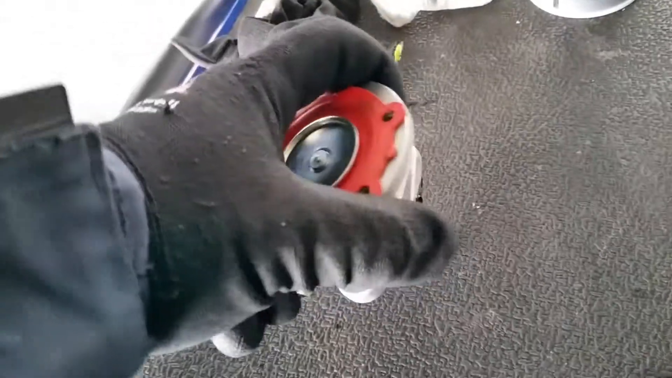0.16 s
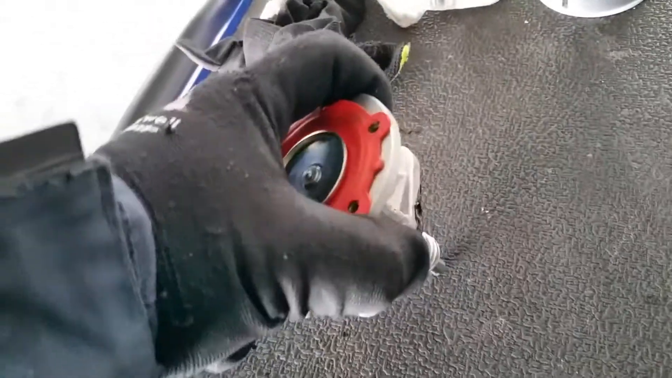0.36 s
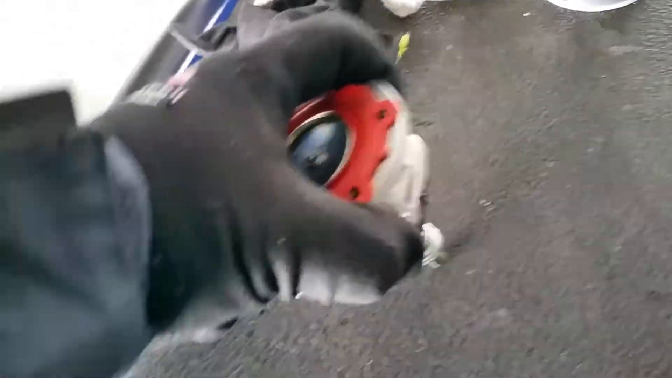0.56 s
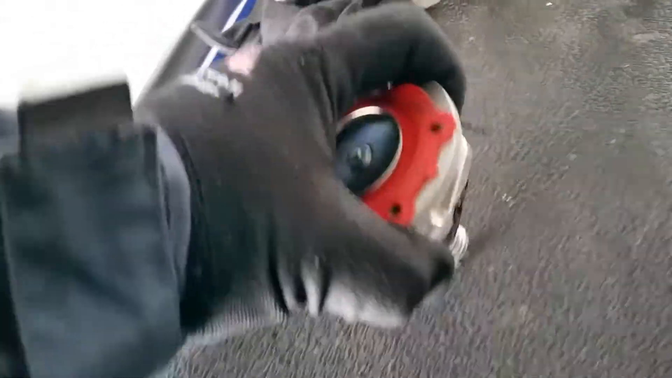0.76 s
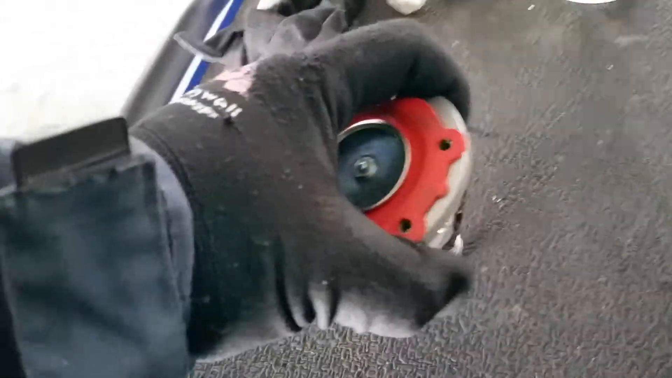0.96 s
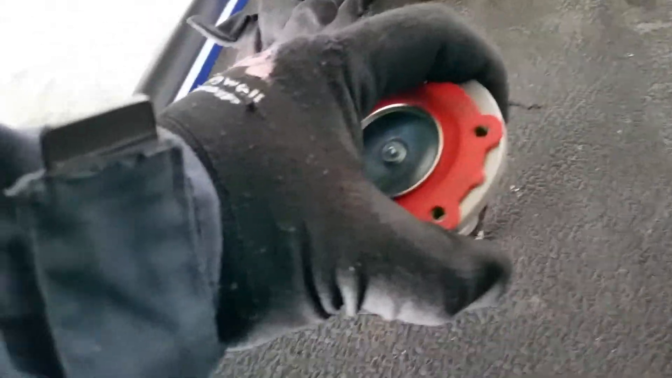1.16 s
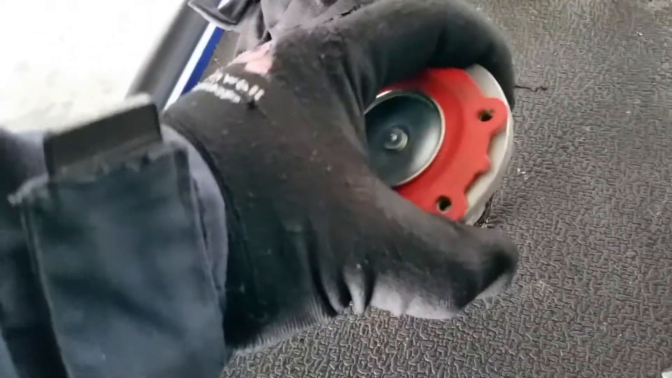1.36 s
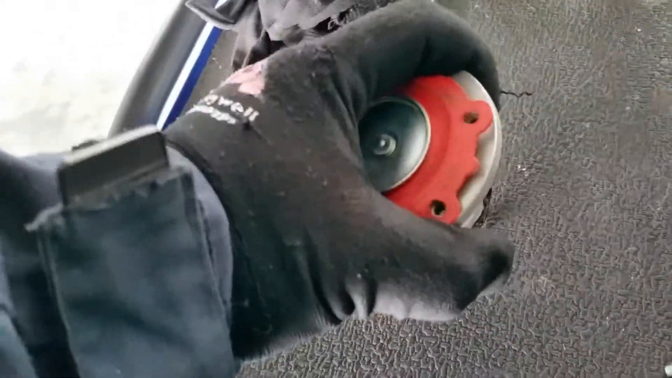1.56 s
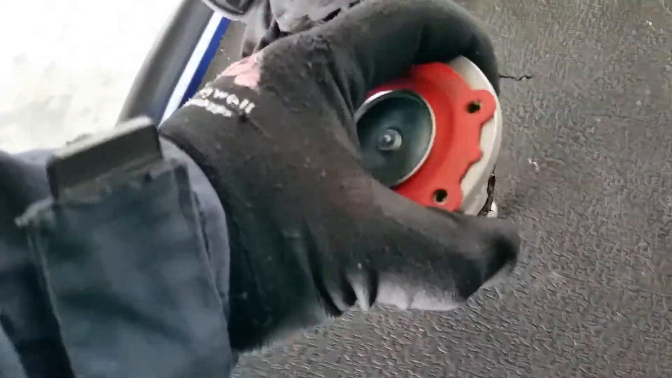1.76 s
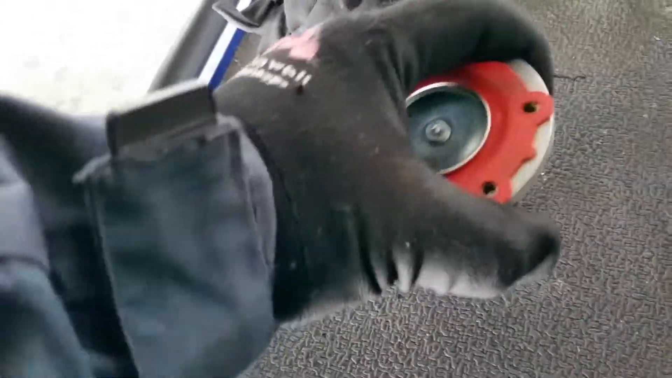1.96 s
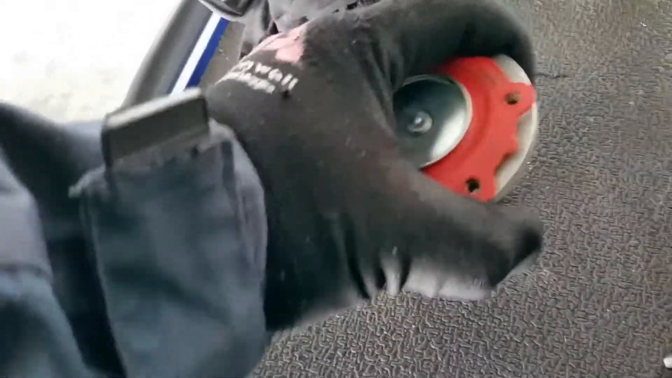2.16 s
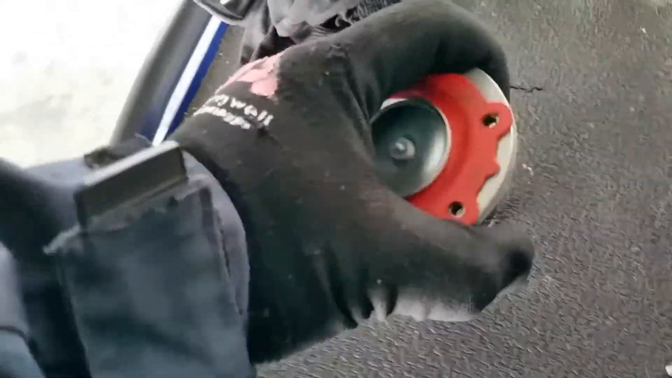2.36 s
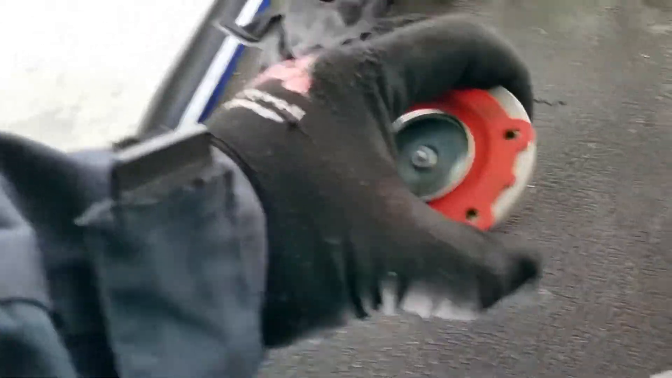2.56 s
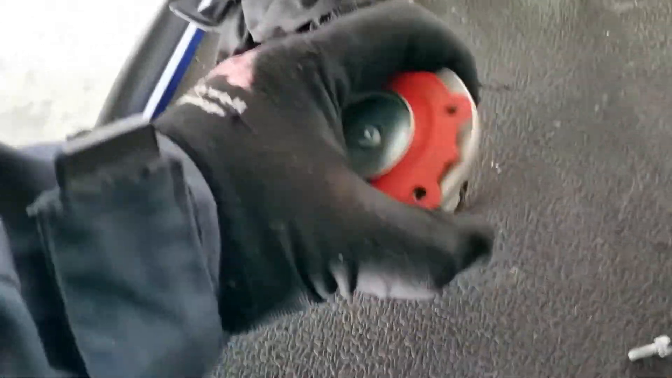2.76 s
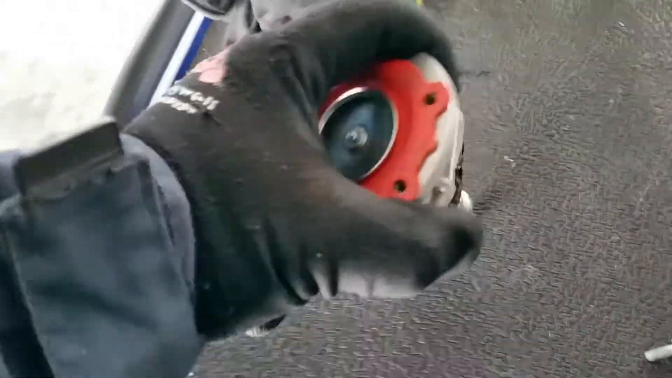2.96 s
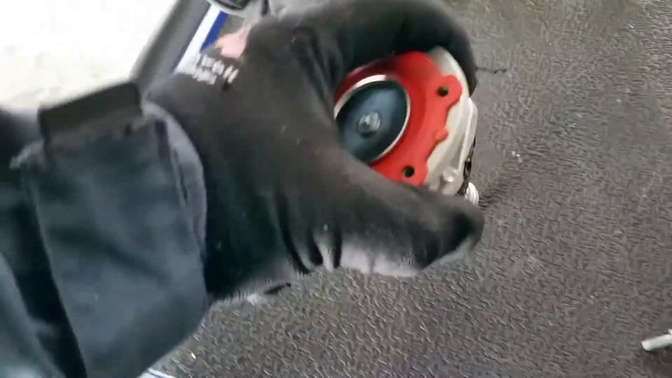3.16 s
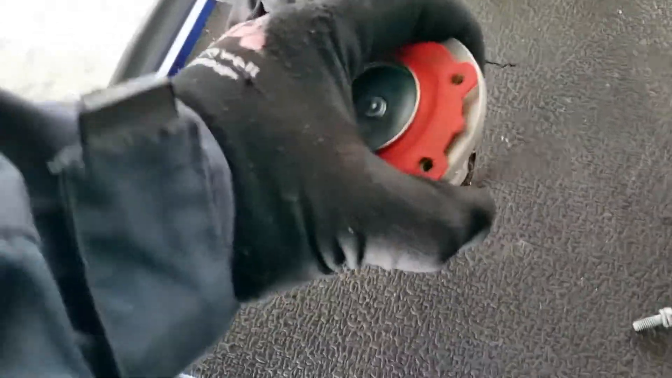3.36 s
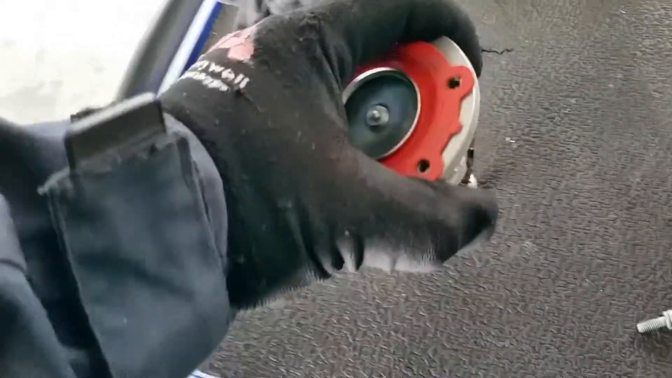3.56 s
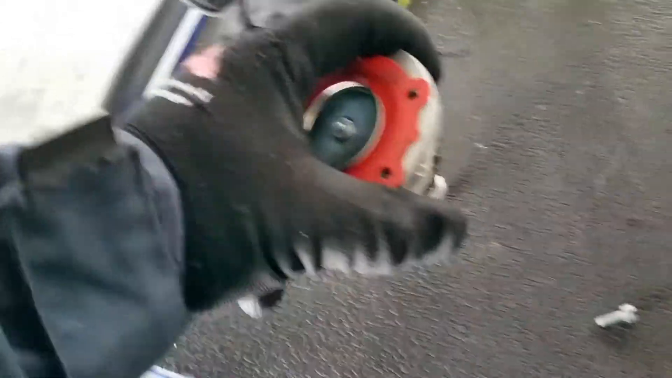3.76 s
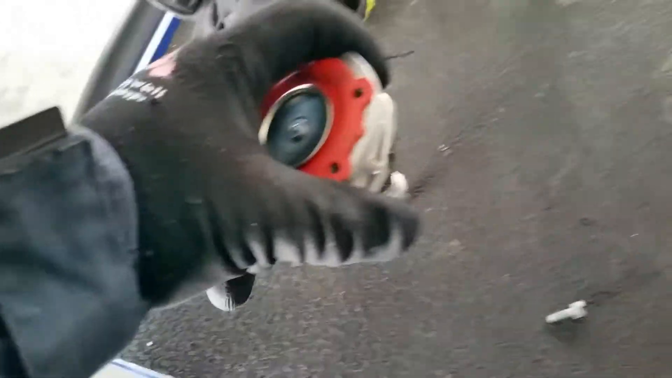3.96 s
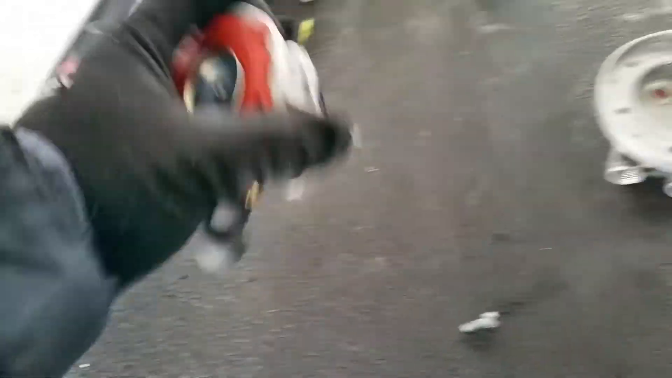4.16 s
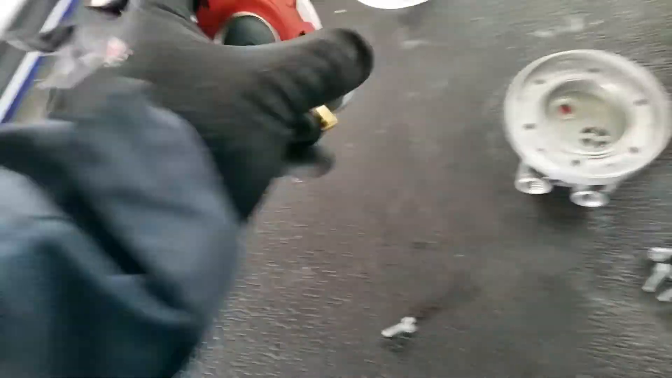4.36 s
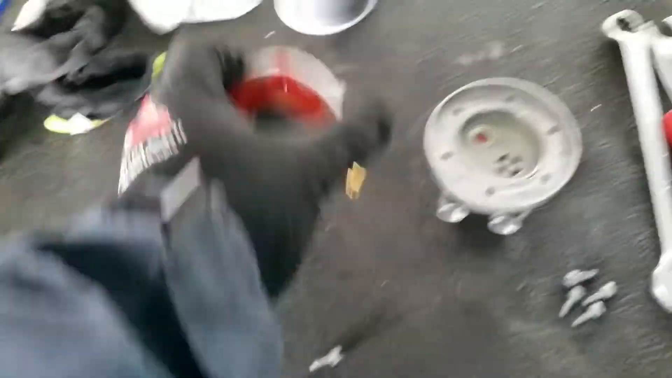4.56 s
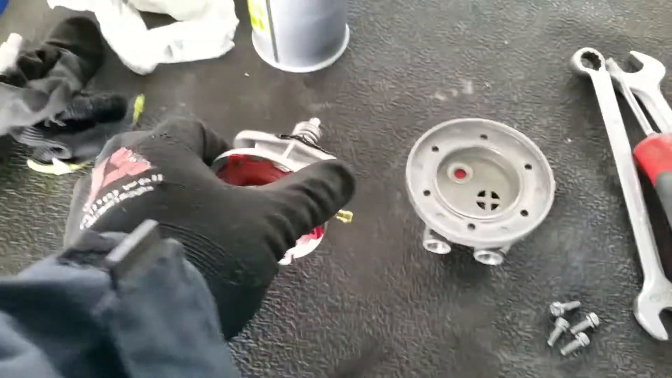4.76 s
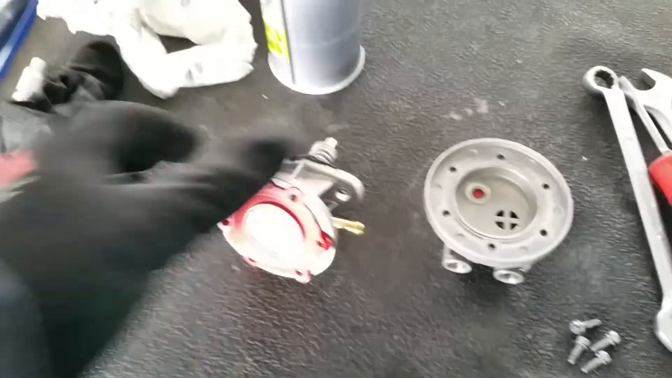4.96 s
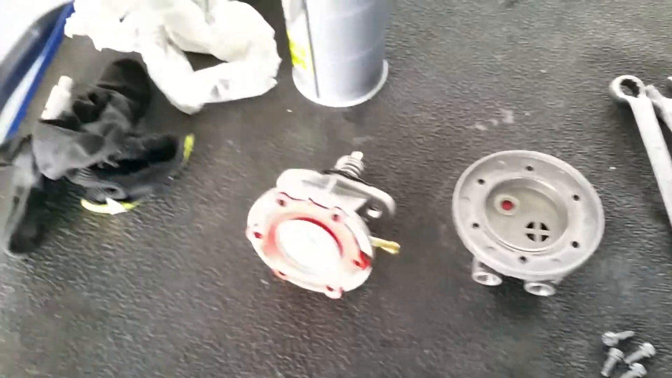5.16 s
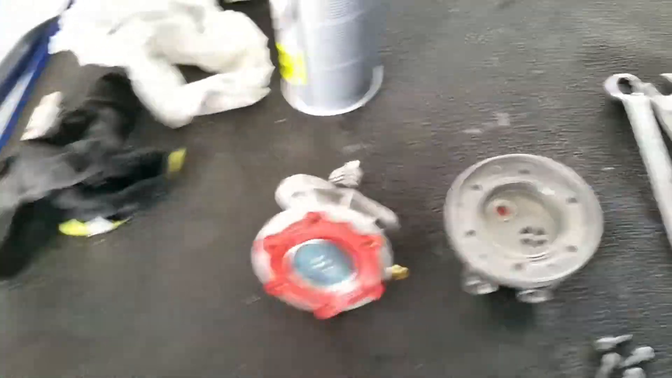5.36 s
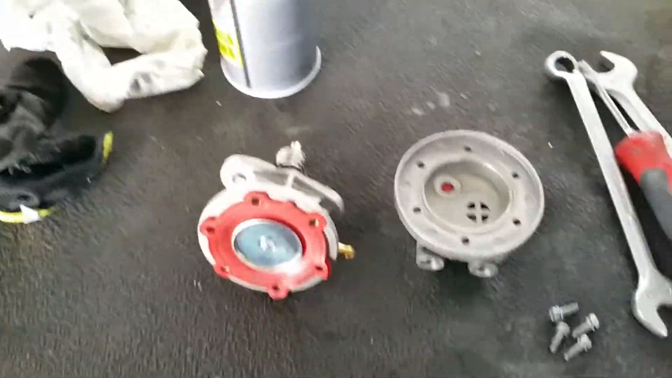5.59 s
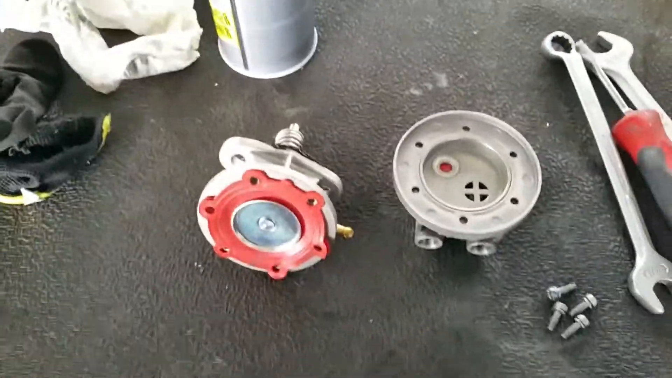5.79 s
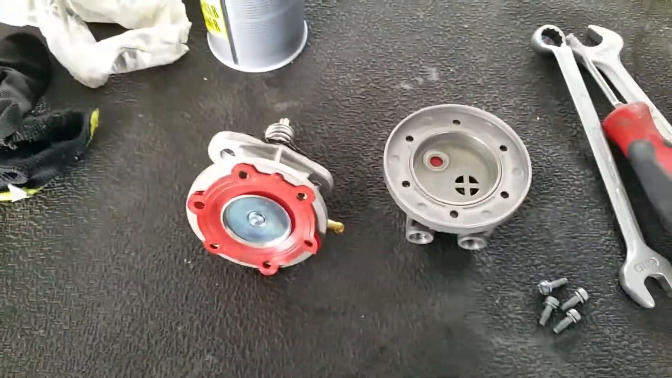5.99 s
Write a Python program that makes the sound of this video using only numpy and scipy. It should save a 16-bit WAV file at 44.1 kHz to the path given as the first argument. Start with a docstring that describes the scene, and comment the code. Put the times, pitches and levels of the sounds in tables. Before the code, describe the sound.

Four dull mechanical clacks on a rubber-matted bench amid close cloth rustling and workshop rumble, ending with a heavy metal thump and rattling clink.

```python
"""Behind a sleeve and glove rustling close to the microphone, a workshop rumbles and hisses and a motor hums.
A gloved hand works the lever of an opened fuel pump against a rubber mat: four dull clacks through the bench.
Meanwhile the motor slows and something squeals faintly; then the pump is put down with a thump and a clink.
Struck bodies are sums of decaying modes plus noise bursts; rustle, rumble and hiss are coloured noise;
motor, squeal and drone are wavering sines. The blows get a room tail, then all passes the microphone ports."""
import sys
import numpy as np
from scipy import signal
from scipy.fft import rfft, irfft, next_fast_len
from scipy.io import wavfile
from scipy.ndimage import uniform_filter1d

SR = 44100
rng = np.random.default_rng(int(sys.argv[2]) if len(sys.argv) > 2 else 0)


def transcribe(u):
    """Save the signal u as a 16-bit wav file named by the first command-line argument.

    u: samples, shape (n,) or (channels, n), limited to [-1, 1]; the rate is SR.
    q: integer samples, one column per channel.
    """
    v = np.clip(np.atleast_2d(u).T, -1, 1)
    q = np.round(v * 32767).astype(np.int16)
    wavfile.write(sys.argv[1], SR, q)


N = 265778
T = np.arange(N) / SR
RING = T[:SR]  # one second for things to ring out
TOP_HZ = 15800  # nothing is heard above this

# lever strokes: t/s, level/dB, metal tick level/dB
STROKES = [(1.8602, -2, -1), (2.464, 0.5, -1), (3.0355, 1, -2), (3.6188, 1, -1.5)]
# colour of the bright sleeve cloth: f/Hz, level/dB
SLEEVE_COLOUR = [(500, 0), (800, -1.5), (1400, -11), (2300, -2), (3200, -12), (4600, -2), (6000, -10.5),
                 (7500, -11), (9500, -3), (11000, -3), (13500, 1.5), (15700, 1.5)]
# colour of a metal tick: f/Hz, level/dB
TICK_COLOUR = [(300, 9.5), (1200, 6.5), (2000, -2.5), (3000, -1.5), (4500, -4), (7000, -59), (10000, -14.5),
               (16000, -5.5)]
# colour of the blurred bench board: f/Hz, level/dB
BOARD_COLOUR = [(150, 7.5), (260, 1.5), (400, 0.5), (560, -2.5), (790, -0.5), (900, -18), (1050, -9),
                (1400, -17), (3000, -51)]


def undb(db):
    """Decibels to gain."""
    return 10 ** (np.asarray(db) / 20)


def curve(rows):
    """The value columns of a table whose first column is t/s, joined by straight lines."""
    s, *columns = np.transpose(rows)
    return [np.interp(T, s, c) for c in columns]


def noise(colour, size=N):
    """Noise of rms 1 with a spectrum drawn through points of f/Hz, level/dB."""
    hz, db = np.transpose(colour)
    bins = np.maximum(np.fft.rfftfreq(size, 1 / SR), 1)
    gain = undb(np.interp(np.log(bins), np.log(hz), db))
    gain = gain * np.minimum(bins / hz[0], 1) ** 2  # falls away below the first point
    gain = gain * (bins < TOP_HZ)
    x = irfft(rfft(rng.standard_normal(size)) * gain, size)
    return x / x.std()


def wide(colour, likeness, size=N):
    """Left and right noise that share a part: likeness 0 is unrelated, 1 is identical."""
    shared = noise(colour, size)
    separate = np.array([noise(colour, size) for _ in range(2)])
    return np.sqrt(likeness) * shared + np.sqrt(1 - likeness) * separate


def pan(db):
    """Left and right gains for a level difference, left minus right."""
    return undb(np.array([[.5], [-.5]]) * db)


def walk(rate):
    """Smooth random drift of spread 1 that changes about rate times a second."""
    k = max(int(SR / rate), 1)
    steps = np.repeat(rng.standard_normal(N // k + 1), k)[:N]
    x = uniform_filter1d(steps, k)
    return x / x.std()


def fade(t60):
    """A decay of 60 dB in t60 seconds."""
    return np.exp(-np.log(1000) * RING / t60)


def ring(modes):
    """Decaying modes set off by one impulse."""
    return sum(undb(db) * fade(t60) * np.sin(2 * np.pi * hz * RING) for hz, db, t60 in modes)


def push(x, ms):
    """Spread a blow over its contact time, as a half-sine of force: longer is duller."""
    force = np.sin(np.pi * np.minimum(RING * 1e3 / ms, 1))
    return irfft(rfft(x, 2 * SR) * rfft(force / force.sum(), 2 * SR))[..., :SR]


def add(out, s, x):
    """Mix a sound in at a time."""
    i = int(s * SR)
    out[:, i:i + len(RING)] += x[..., :N - i]


def tone(hz, waver, rate):
    """A sine of rms 1 whose pitch wavers by the fraction waver."""
    return np.sqrt(2) * np.sin(2 * np.pi * np.cumsum(hz * (1 + waver * walk(rate))) / SR)


def swell(start, end):
    """One smooth rise and fall."""
    return np.sin(np.pi * np.clip((T - start) / (end - start), 0, 1))


def move(start, end, attack_s, release_s):
    """A level that builds up, holds from start to end and dies away, by a factor e in the given times."""
    return np.exp(-np.maximum(start - T, 0) / attack_s - np.maximum(T - end, 0) / release_s)


def together(gains, rest_db):
    """Unrelated rustles add in power, over what is left at rest."""
    return np.sqrt(undb(rest_db) ** 2 + sum(g ** 2 for g in gains))


def cloth(db, colour, likeness, grain_db):
    """Fibres catch and slip: a fine grainy hiss."""
    return wide(colour, likeness) * undb(db + grain_db * walk(320))


def shop():
    """Deep rumble, shuffling, and on the left a steady hiss with a faint whine in it."""
    # colour of the distant rumble: f/Hz, level/dB
    rumble_colour = [(18, -36), (30, 12.5), (46, 14.5), (65, 15), (95, 12), (140, 7.5), (220, -4.5),
                     (500, -67)]
    # dull shuffling in the shop: full force from t/s, until t/s, level/dB
    shuffle_moves = [(1.278, 1.39, -45.5), (1.66, 1.85, -48), (3.28, 3.701, -54), (4.376, 4.7, -49),
                     (4.822, 5.013, -44), (5.162, 5.304, -55)]
    # colour of the shuffling: f/Hz, level/dB
    shuffle_colour = [(90, 4), (140, 3), (200, 0.5), (280, -2), (400, -7.5), (650, -13.5), (1000, -18.5),
                      (1600, -31), (3000, -70.5)]
    # colour of the hiss: f/Hz, level/dB
    hiss_colour = [(1000, -5), (3300, -8.5), (3700, -2.5), (3860, 4.5), (4050, 0.5), (4450, -3.5),
                   (5200, -40), (7500, -73), (16000, -4.5)]
    rumble = undb(-47.5) * wide(rumble_colour, 0.42)
    gains = [undb(db) * move(start, end, attack_s=0.062, release_s=0.2) for start, end, db in shuffle_moves]
    unsteady = undb(3 + 1.9 * walk(11))
    shuffle = together(gains, rest_db=-51) * wide(shuffle_colour, 0.75) * unsteady
    hiss = undb(-59.5) * wide(hiss_colour, 0.072)
    whine = undb(-70) * tone(3860, waver=.002, rate=30)
    return rumble + shuffle + (hiss + whine) * pan(10.6)


def motor():
    """A low uneven hum of shaft-speed multiples that sinks as the shaft slows."""
    # the motor's run: t/s, shaft f/Hz, level/dB
    shaft = [(0, 53.24, -43.5), (.45, 52.72, -48), (1, 52.03, -45.5), (1.6, 51.75, -44), (1.9, 50.08, -47),
             (2.25, 46.88, -50.5), (2.7, 43.33, -51.5), (3.2, 42.2, -52), (6.03, 41.73, -56)]
    # its harmonics: multiple of shaft f, level/dB
    orders = [(1, 0.5), (2, -1), (3, -7.5), (4, -14.5), (5, -13.5), (6, -14)]
    hz, db = curve(shaft)
    turn = 2 * np.pi * np.cumsum(hz * (1 + 0.0037 * walk(5.94))) / SR
    hum = 0
    for multiple, order_db in orders:
        level = undb(db + order_db + 1.1 * walk(5.53))
        hum = hum + level * np.sin(multiple * turn + rng.uniform(0, 2 * np.pi))
    return np.sqrt(2) * hum


def sleeve():
    """Bright cloth hiss: the sleeve slides when the arm moves and jerks at each lever stroke."""
    # arm moves: full force from t/s, until t/s, level/dB, left minus right/dB
    arm_moves = [(.04, 0.395, -66, 2.5), (0.577, 0.797, -68.5, -3), (0.915, 0.979, -54.5, -2),
                 (1.65, 1.696, -62.5, -1), (2.026, 2.068, -59, -0.5), (2.272, 2.42, -65, 1),
                 (2.895, 2.917, -68, -1), (3.297, 3.528, -65, -5), (3.726, 4.021, -66, 4),
                 (4.14, 4.24, -54, 0.5), (4.43, 4.53, -44, 1), (4.63, 4.697, -53, -1),
                 (5.076, 5.22, -46, -5.5), (5.324, 5.51, -48.5, -1.5), (5.602, 5.701, -58.5, -0.5)]
    slides = [undb(db) * pan(pan_db) * move(start, end, attack_s=0.099, release_s=0.11)
              for start, end, db, pan_db in arm_moves]
    hold_s = 0.1
    jerks = [undb(-63) * pan(-2.5) * move(s, s + hold_s, attack_s=0.022, release_s=.045)
             for s, _, _ in STROKES]
    hiss = cloth(1.17 + 0.38 * walk(13), SLEEVE_COLOUR, likeness=0.032, grain_db=1.03)
    return together(slides + jerks, rest_db=-71.5) * hiss


def glove():
    """The glove rubs over the casting with a duller hiss whenever the hand turns the pump."""
    # rubs: full force from t/s, until t/s, level/dB
    rub_moves = [(0, 0.144, -60), (0.905, 1.05, -56), (1.397, 1.706, -58.5), (1.884, 2.19, -60),
                 (2.493, 2.6, -61.5), (3.28, 3.7, -66), (4.146, 4.27, -60), (4.401, 4.817, -54),
                 (5.033, 5.15, -54.5), (5.4, 6.032, -57.5)]
    # colour of the glove: f/Hz, level/dB
    glove_colour = [(400, -8.5), (900, -4), (1500, -7), (1950, -5.5), (2200, -3.5), (2500, -4.5),
                    (3000, -7), (4400, -9), (5500, -21.5), (8000, -37)]
    rubs = [undb(db) * move(start, end, attack_s=0.18, release_s=0.14) for start, end, db in rub_moves]
    hiss = cloth(2.13 + 0.64 * walk(16), glove_colour, likeness=0.05, grain_db=1.1)
    return together(rubs, rest_db=-69) * hiss


def drags():
    """Short slides of cloth over the cuff, a narrow hiss, each a little unsteady."""
    # drags: full force from t/s, until t/s, level/dB
    drag_moves = [(.04, .15, -62.5), (1.33, 1.42, -66), (1.55, 1.68, -59), (2.58, 2.64, -64.5),
                  (3.279, 3.32, -60.5), (3.39, 3.41, -60), (4.14, 4.48, -61), (5.04, 5.252, -57.5)]
    # colour of the drags: f/Hz, level/dB
    drag_colour = [(1500, -26), (2000, -5), (2200, 2), (2400, -6.5), (2900, -43), (6000, -43)]
    gains = [undb(db) * move(start, end, attack_s=0.043, release_s=0.04) for start, end, db in drag_moves]
    force = np.max(gains, axis=0)
    return force * cloth(1.3 * walk(24.96), drag_colour, likeness=0.51, grain_db=2.0)


def grip():
    """Padded fingers knock on the casting, which raps the bench; the rubber lets go with tiny snaps."""
    # the grip shifts: t/s, thud level/dB, hollow rap level/dB, tick level/dB
    knocks = [(0.5524, -44, -49, -44.5), (1.061, -39, -51, -57), (1.278, -35, -53, -65),
              (2.401, -34, -50, -44), (2.5494, -29, -45, -46.5), (3.388, -33.5, -57, -51),
              (3.44, -48, -53, -44), (3.512, -35.5, -43, -55), (4.266, -34, -41, -52),
              (5.478, -31, -35.5, -40), (5.768, -33, -44, -63)]
    # colour of the thud: f/Hz, level/dB
    knock_colour = [(60, 13), (150, 1), (330, -3.5), (480, -4.5), (800, -43), (1500, -26), (4000, -45)]
    # snaps of the rubber glove: t/s, level/dB
    snaps = [(2.039, -47), (2.27, -49), (2.32, -50), (2.782, -55)]
    out = np.zeros((2, N))
    for s, thud_db, rap_db, tick_db in knocks:
        thud = push(noise(knock_colour, size=SR) * fade(0.094), ms=0.86)
        rap = noise(BOARD_COLOUR, size=SR) * fade(0.036)
        tick = wide(TICK_COLOUR, 0.69, size=SR) * fade(0.032)
        add(out, s, undb(thud_db) * thud + undb(rap_db) * rap + undb(tick_db) * tick)
    for s, db in snaps:
        add(out, s, undb(db) * wide(SLEEVE_COLOUR, .3, size=SR) * fade(0.013))
    return out


def lever():
    """Each stroke hits its stop and rocks the pump into the mat: it thuds, the steel ticks and chatters."""
    # the pump held on the mat: f/Hz, level/dB, t60/s, left minus right/dB
    pump_modes = [(87.5, -27.5, 0.17, -2), (99, -24.5, 0.063, -1), (165, -22.5, 0.027, 0.5),
                  (133.7, -35.5, 0.28, 0), (187, -28.5, 0.2, -0.5), (264, -26.5, 0.015, 0),
                  (260.6, -43, 0.22, 1), (595, -39, 0.015, 0), (799, -29.5, 0.023, 1),
                  (1103, -32.5, 0.043, 7), (1160.5, -31.5, 0.018, 2), (1330, -34, 0.02, 7),
                  (1560, -36, 0.016, 6)]
    # stop first, then the mat, then early echoes from close by: delay t/s, level/dB, contact time/ms
    arrivals = [(0, 2, 0.42), (.0033, -17, 0.8), (.0068, -0.5, 0.77), (0.0193, -13, 0.66), (.027, -9.5, 1),
                (.037, -16, 1)]
    # colour of the chatter: f/Hz, level/dB
    chatter_colour = [(400, 9.5), (780, 1.5), (1000, -13), (1120, -4), (1350, -2), (1620, -12), (2000, -12),
                      (5000, -50)]
    out = np.zeros((2, N))
    body = sum(ring([(hz, db, t60)]) * pan(pan_db) for hz, db, t60, pan_db in pump_modes)
    for s, db, tick_db in STROKES:
        for delay, arrival_db, ms in arrivals:
            # the push starts a touch ahead of the tick
            add(out, s + delay - .0004, undb(db + arrival_db) * push(body, ms))
        tick = undb(-29) * wide(TICK_COLOUR, 0.59, size=SR) * fade(0.033)
        chatter = undb(-34.5) * wide(chatter_colour, 0.74, size=SR) * fade(0.14)
        add(out, s, undb(tick_db) * tick + undb(db) * chatter)
    return out


def squeal():
    """Thin tones, stronger on the right, that swell, waver and die away."""
    # faint squeals: start t/s, end t/s, f/Hz, level/dB
    squeals = [(1.895, 1.975, 2655, -56), (2.01, 2.08, 2645, -53), (2.09, 2.23, 2643, -58),
               (1.93, 2.4, 3063, -59), (2.05, 2.135, 3066, -55), (1.97, 2.32, 1534, -65)]
    out = 0
    for start, end, hz, db in squeals:
        level = undb(db - 3 + 1.5 * walk(45)) * swell(start, end)
        out = out + level * tone(hz, waver=.002, rate=70)
    return out * pan(-6.0)


def bench():
    """The pump lands on one edge, rocks and settles; the bench top booms, its many higher modes blurring together."""
    # blows on the bench: t/s, level/dB, contact time/ms
    blows = [(4.655, -11, 5.6), (4.7004, 1, 0.83), (4.7088, -7, 1.4), (4.7163, -14, 0.83), (4.7239, -5, 2),
             (4.7308, -10.5, 0.83), (4.781, -14.5, 2.6), (4.829, -17, 2.3), (5.438, -12, 6)]
    # the bench top under its mat: f/Hz, level/dB, t60/s
    bench_modes = [(88, -44, .25), (141, -20, 0.24), (165, -8, 0.055), (215, -17, 0.11),
                   (260.5, -21.5, 0.29), (305, -13, 0.044), (406, -18, 0.26), (485, -16.5, 0.056),
                   (542.7, -15.5, 0.11), (602, -24, 0.28), (682, -26, .07), (727, -17.5, 0.061),
                   (785, -30, 0.15), (1188, -32.5, 0.11)]
    out = np.zeros((2, N))
    boom = ring(bench_modes)
    for s, db, ms in blows:
        # the difference of two fades lets the blur build up before it decays
        board = wide(BOARD_COLOUR, 0.99, size=SR) * (fade(0.23) - fade(0.0081))
        add(out, s, undb(db) * push(boom, ms))
        add(out, s, undb(db - 19.0) * push(board, ms))
    return out


def drone():
    """A low wavering note sets in with the thump; two soft low bumps of the bench sound over it."""
    # soft bumps of the bench: full level from t/s, until t/s, level/dB
    soft_bumps = [(4.883, 4.91, -29.5), (5.452, 5.474, -34)]
    start_s, rise_s = 4.7, 0.23
    steady = undb(-47.5) * np.clip((T - start_s) / rise_s, 0, 1)
    bumps = sum(undb(db) * move(start, end, attack_s=.018, release_s=0.027)
                for start, end, db in soft_bumps)
    return steady * tone(139.5, waver=0.0145, rate=12) + bumps * tone(133, waver=.02, rate=20)


def clinks():
    """Loose metal parts touch and rattle: a short crack and a thin ring."""
    # touches: t/s, level/dB
    touches = [(4.703, -13), (4.7114, -7), (4.7147, -2), (4.7197, -9), (4.7262, -9), (4.733, -14)]
    # the ring of the parts: f/Hz, level/dB, t60/s
    metal_modes = [(4450, -38, .06), (6691, -55, .25), (8812, -52, .2), (9300, -32, .025), (10360, -52, .2),
                   (12260, -44, .13), (15480, -41, .1)]
    # colour of the crack: f/Hz, level/dB
    clink_colour = [(600, -6), (1800, 5), (4500, 3), (6000, -4.5), (7500, -10.5), (9300, -2.5), (13000, -6),
                    (16000, -13)]
    out = np.zeros((2, N))
    for s, db in touches:
        crack = wide(clink_colour, 0.17, size=SR) * fade(.011)
        add(out, s, undb(db) * (undb(-17.0) * crack + undb(-1.0) * ring(metal_modes)))
    return out


def radiate(x, corner_hz):
    """Small bodies move little air at the deepest pitches: a high-pass."""
    return signal.sosfilt(signal.butter(3, corner_hz, "high", fs=SR, output="sos"), x)


def room(x, delay_s=0.0093, bass_hz=900):
    """A short diffuse tail of decaying noise bands; its bass is alike left and right, its treble is not."""
    # the room's answer: f/Hz, level/dB, t60/s
    room_bands = [(68, 0, 0.99), (141, -9.5, 0.25), (298, -9.5, 0.69), (600, -19, 0.61), (1210, -8, 0.43),
                  (3000, -4.5, 0.24), (7900, -8.5, 0.73), (15000, -11, 0.12)]
    hz, db, t60 = np.transpose(room_bands)
    bins = np.maximum(np.fft.rfftfreq(SR, 1 / SR), 1)
    mid, side = rfft(rng.standard_normal((2, SR)))
    spread = np.pi / 4 * np.minimum(bins / bass_hz, 1)
    field = mid * np.cos(spread) + side * np.sin(spread) * np.array([[1], [-1]])
    tail = 0
    for share, band_db, band_t60 in zip(np.eye(len(hz)), db, t60):
        # silent for delay_s, then rising to full over as long again
        decay = fade(band_t60) * np.clip(RING / delay_s - 1, 0, 1)
        # each band overlaps its neighbours as a triangle over log frequency
        band = irfft(field * np.interp(np.log(bins), np.log(hz), share), SR)
        tail = tail + undb(band_db) * band * decay / np.linalg.norm(decay)
    return signal.fftconvolve(x, tail, axes=1)[:, :N]


def scene():
    """Blows with their room, cloth close to the microphone, the shop behind."""
    blows = radiate(lever() + grip() + undb(1.5) * bench(), corner_hz=77.6) + clinks()
    close = sleeve() + glove() + drags()
    return blows + undb(-3.0) * room(blows) + close + motor() + squeal() + drone() + shop()


def record(dry):
    """Each port adds its colour, the right one hears a little later; high peaks are rounded and the top cut."""
    # the two microphone ports differ in colour: f/Hz, left minus right/dB
    ports = [(60, 0.5), (180, -2.5), (400, 1), (800, -3), (1150, -5), (2300, -7.5), (3300, -2),
             (4700, -3.5), (6200, -11.5), (8300, 3.5), (9500, 8.5), (11000, 1), (13600, -2), (15700, -4)]
    port_lag_s = .00013
    hz, db = np.transpose(ports)
    size = next_fast_len(N + SR // 10)
    bins = np.maximum(np.fft.rfftfreq(size, 1 / SR), 1)
    lag = np.exp(-2j * np.pi * bins * port_lag_s * np.array([[0], [1]]))
    colour = pan(np.interp(np.log(bins), np.log(hz), db))
    heard = irfft(rfft(dry, size) * colour * lag, size)[:, :N]
    rounded = heard / (1 + (heard / .88) ** 6) ** (1 / 6)
    return signal.sosfilt(signal.ellip(10, .2, 70, TOP_HZ, fs=SR, output="sos"), rounded)


dry = scene()
out = record(dry)
transcribe(out)
```